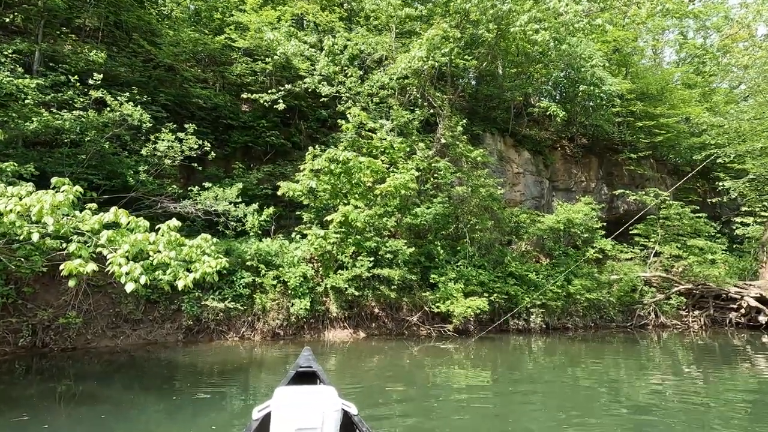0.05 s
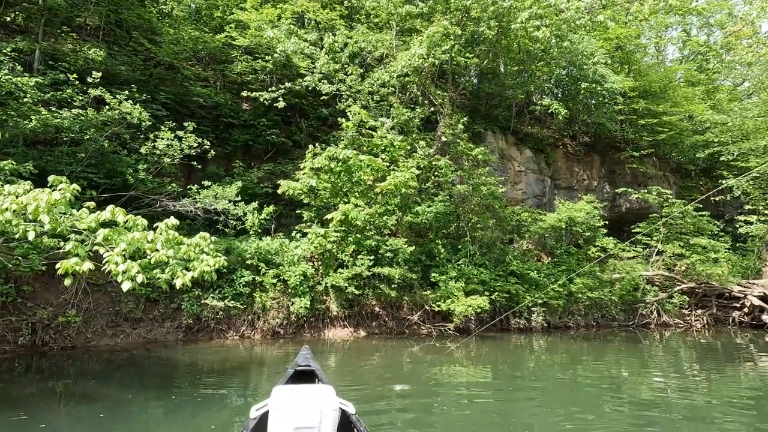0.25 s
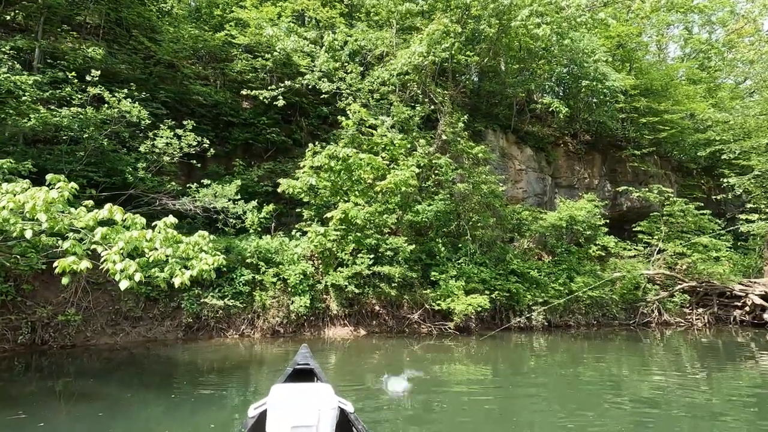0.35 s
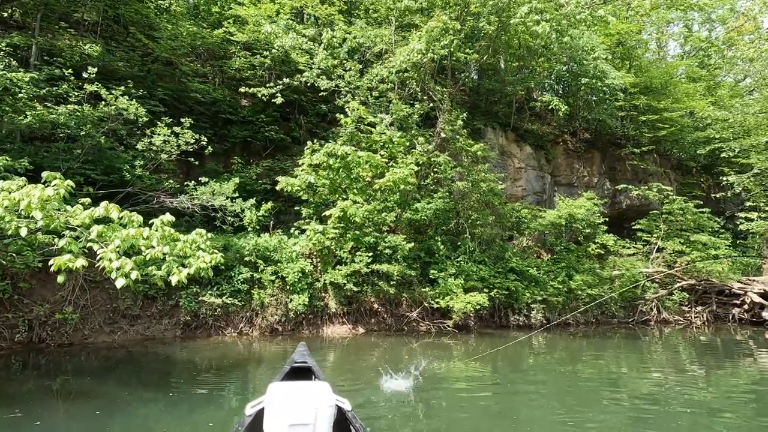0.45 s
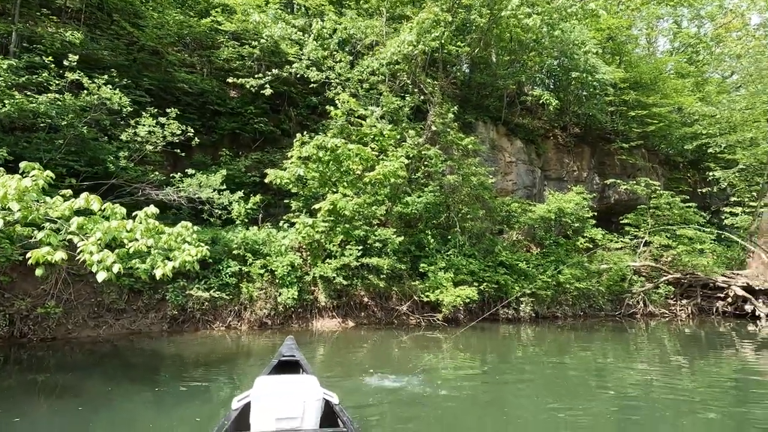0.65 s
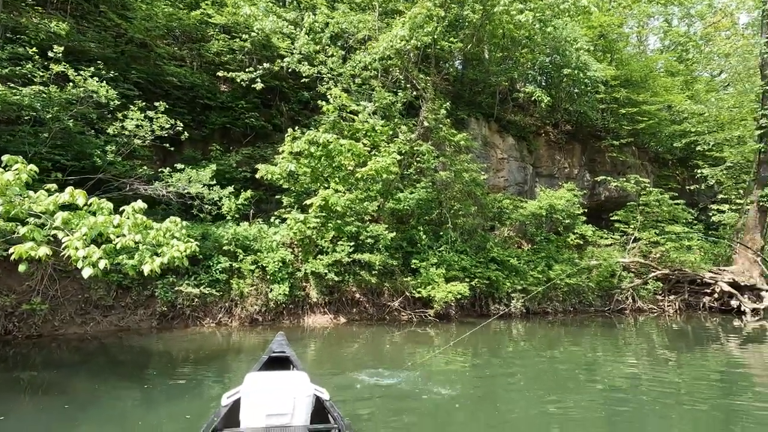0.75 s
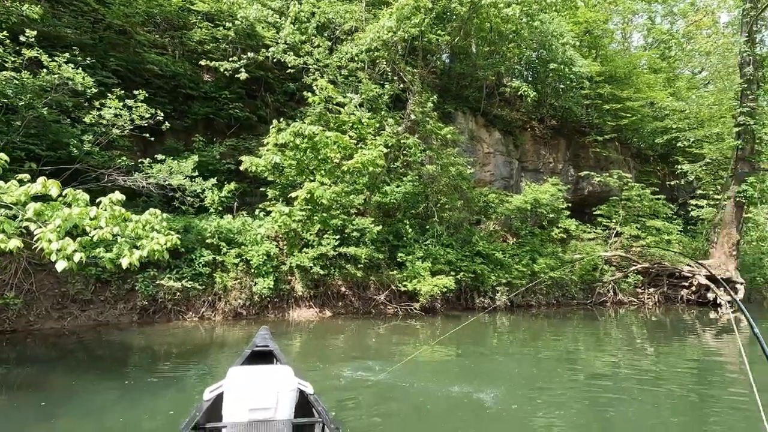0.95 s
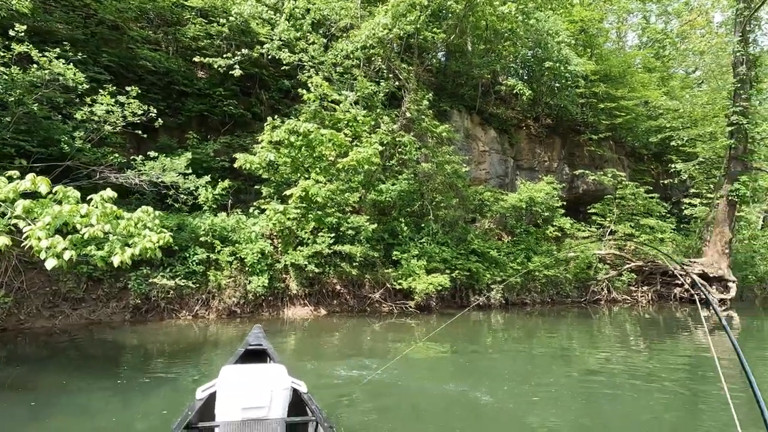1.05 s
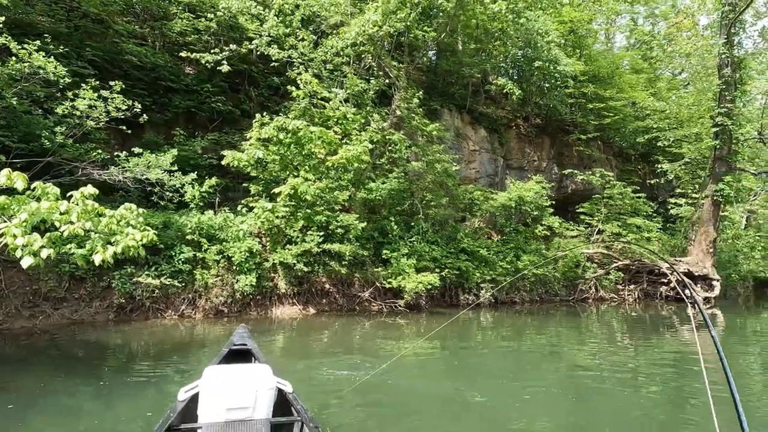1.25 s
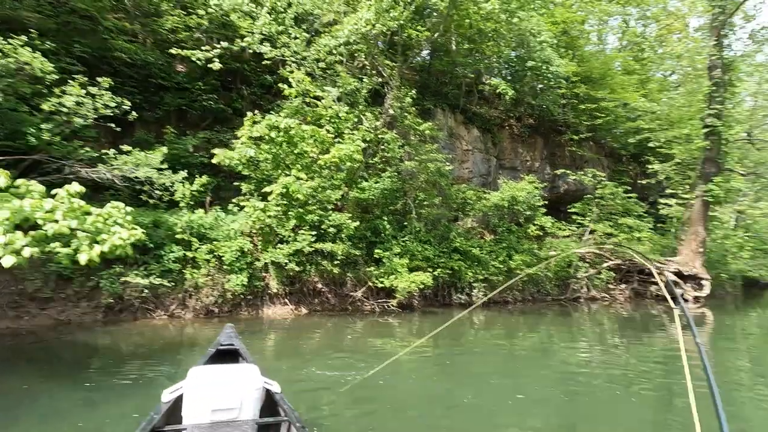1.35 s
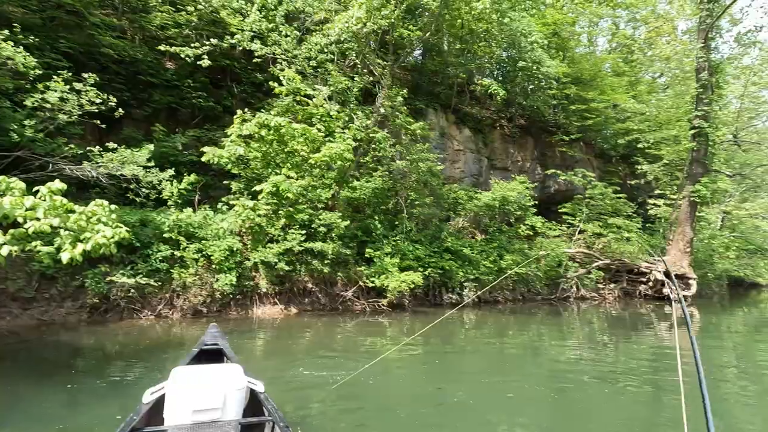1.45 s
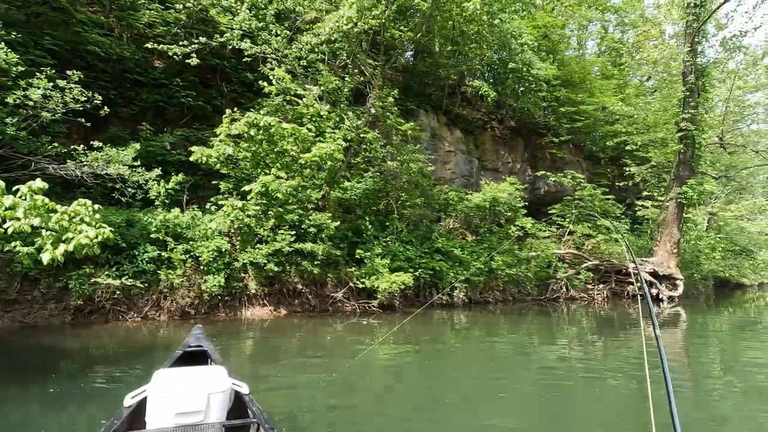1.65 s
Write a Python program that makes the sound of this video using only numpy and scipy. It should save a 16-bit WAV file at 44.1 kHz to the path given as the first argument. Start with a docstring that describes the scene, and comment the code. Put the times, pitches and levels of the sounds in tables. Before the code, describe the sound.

A fishing line hisses out and plops into a river with a knock, birds chirping faintly.

```python
"""On a quiet river, a fly is cast from a canoe. Sliding friction makes the line hiss in the rod guides.
The fly plops onto the water, where bubbles ring at their resonance, and the line snaps tight with a
knock. Spray patters back, slack is drawn in and the rod swishes once through the air. Birds chirp
along the wooded bank, which echoes them, over a light breeze and the low murmur of the river."""
import sys
import numpy as np
from scipy import signal
from scipy.fft import rfft, irfft
from scipy.io import wavfile
from scipy.ndimage import map_coordinates

SR = 44100
rng = np.random.default_rng(int(sys.argv[2]) if len(sys.argv) > 2 else 0)


def dump(signal):
    """Clip the signal to [-1, 1] and save it as 16-bit WAV at the path in sys.argv[1]."""
    limited = np.clip(np.atleast_2d(signal).T, -1, 1)
    pcm = np.round(limited * 32767).astype(np.int16)
    wavfile.write(sys.argv[1], SR, pcm)


N = 72765
T = np.arange(N) / SR

# Envelopes of the sustained sounds. Each row: time in seconds, level in dB.
LINE_OUT_LEVEL = [(0, -81.5), (.114, -89.5), (.121, -70), (.14, -73), (.155, -66.5), (.26, -57.5),
                  (.457, -54), (.472, -76.5), (.51, -114)]
LINE_IN_LEVEL = [(.5, -89), (.55, -77.5), (.74, -82.5), (.76, -64), (.805, -65.5), (.817, -79), (.83, -66),
                 (.86, -86), (1.2, -101)]
RUSTLE_LEVEL = [(1.31, -105), (1.34, -83.5), (1.6, -100)]
SPRAY_LEVEL = [(.4, -62), (.47, -68.5), (.53, -66), (.68, -62.5), (.79, -72.5), (.96, -95), (1.2, -105)]
TRICKLE_LEVEL = [(.68, -72), (1.0, -86.5), (1.2, -98.5)]
SWISH_LEVEL = [(1.22, -100), (1.28, -73), (1.38, -71), (1.45, -82), (1.6, -96)]
CHORUS_LEVEL = [(1.1, -82), (1.3, -86.5), (1.5, -79), (1.65, -84.5)]
BREEZE_LEVEL = [(0, -59), (.11, -43), (.56, -49), (1.1, -76.5)]
MURMUR_LEVEL = [(.4, -62.5), (.95, -60), (1.2, -63.5)]
RIPPLE_LEVEL = [(.08, -86), (.35, -70.5), (.75, -73), (1.04, -84), (1.65, -81.5)]

# Spectra of the noises. Each row: frequency in Hz, relative spectral density in dB.
HISS_SPECTRUM = [(600, -19), (1450, -15), (1800, -15.5), (3000, -6), (3800, 0.5), (4600, 0.5), (5900, -11),
                 (6900, -15), (8900, -35.5), (11000, -23.5), (13200, -38.5), (13900, -54)]
RUSTLE_SPECTRUM = [(2300, -20), (3800, 0), (7000, -37.5)]
SLAP_SPECTRUM = [(600, -23), (1100, 5), (2100, -4), (2900, -11.5), (5500, -15.5), (9000, -37),
                 (11500, -24.5), (15000, -68)]
SPRAY_SPECTRUM = [(200, -9.5), (450, -3), (700, -5), (1150, 1), (1650, -12.5), (7000, -22.5), (9000, -35),
                  (11500, -34.5), (15000, -53)]
SWISH_SPECTRUM = [(70, -1), (150, 10.5), (300, 1.5), (700, 8), (1300, 0.5), (7000, -42)]
CHORUS_SPECTRUM = [(1500, -13), (2550, 1.5), (2850, -1.5), (3150, 1), (5000, -57.5)]
BREEZE_SPECTRUM = [(12, 4), (28, -9.5), (1000, -72.5)]
MURMUR_SPECTRUM = [(25, 8), (60, -6.5), (100, -14), (160, 2.5), (240, -4.5), (330, -18.5), (550, -30.5),
                   (2500, -49), (16000, -59)]
RIPPLE_SPECTRUM = [(350, 6), (750, -4), (1150, 5), (1700, -3.5), (4000, -24), (7000, -24)]

# Motion of the line in the guides. Each row: time in seconds, relative speed.
LINE_SPEED = [(.24, .98), (.35, 1.04)]
# Jolts of the tightening line. Each row: start in seconds, relative impulse in dB, rise in seconds.
JOLTS = [(0.4538, -1, 0.0016), (0.4592, 0, 0.000021)]
# Response of each side to a jolt. Each row: frequency in Hz, gain in dB.
KNOCK_LEFT = [(5, 3.5), (30, 24.5), (220, 10.5), (480, -1.5), (1100, 9), (3000, -2), (8500, -24.5),
              (16500, -24.5)]
KNOCK_RIGHT = [(95, -5.5), (150, 20), (220, 20), (400, 18), (950, 11), (2000, -1.5), (3400, -11.5),
               (5200, -33.5), (10000, -51.5)]
# Fly and leader hitting the water. Each row: start in seconds, level in dB.
SLAPS = [(.4015, -40.5), (.4115, -41.5), (.4335, -42.5), (.4402, -39.5)]
# Bubbles of the plop and its drops. Each row: start in seconds, peak in dB, pitch in Hz, decay in seconds.
BUBBLES = [(0.401, -33, 1250, 0.0015), (0.4077, -36.5, 1066, 0.0022), (0.416, -37, 1106, 0.0017),
           (0.4332, -31.5, 1000, 0.00083), (0.4409, -36.5, 776, 0.00082), (.485, -52, 974, 0.0055),
           (.515, -49, 842, 0.0035), (.558, -53.5, 857, 0.0079), (.682, -54.5, 1163, 0.009),
           (.684, -55.5, 395, 0.005), (.695, -59, 527, 0.006), (.821, -62, 1150, .004),
           (0.8775, -62, 2700, 0.0013), (0.902, -66, 1260, 0.006), (0.938, -61, 1180, 0.0014),
           (1.004, -67, 3020, 0.0032)]
# Small wet ticks. Each row: start in seconds, level in dB, centre frequency in Hz.
TICKS = [(0.641, -58, 3070), (0.674, -70, 11100), (0.697, -57.5, 3650), (0.9, -61.5, 3420),
         (0.993, -70, 2910), (1.129, -72, 4600)]
# Bird notes. Each row: start and length in seconds, level in dB, first, middle and last pitch in Hz.
CHIRPS = [(-.02, 0.034, -64.5, 2200, 2004, 2160), (.008, 0.048, -79, 2300, 2950, 3350),
          (0.055, 0.064, -78.5, 3330, 2690, 2220), (1.08, 0.045, -67, 901, 1466, 2880),
          (1.102, 0.032, -68, 2250, 2565, 2500), (1.162, 0.049, -72, 1895, 2092, 1440),
          (1.238, 0.21, -82.5, 3055, 3140, 3086), (1.37, 0.02, -67.5, 2693, 2744, 2760),
          (1.451, 0.029, -73, 2483, 2413, 2350), (1.522, .042, -65.5, 2590, 2590, 2805),
          (1.569, 0.072, -75, 2290, 2017, 1460)]


def line_hiss(grain_db=1.75, grain_hz=280):
    """Sliding friction in the guides makes a grainy noise whose frequencies scale with line speed."""
    going_out = level(LINE_OUT_LEVEL) * pan(-3)
    coming_in = level(LINE_IN_LEVEL) * amp(1.76 * drift(hz=50))
    travel = np.cumsum(np.interp(T, *np.transpose(LINE_SPEED)))
    roughness = noise(HISS_SPECTRUM, phase_rad=-0.81)
    friction = np.array([map_coordinates(side, [travel], order=5, mode="mirror") for side in roughness])
    grain = amp(grain_db * drift(grain_hz))
    return np.hypot(going_out, coming_in) * grain * friction


def line_rustle():
    """Friction gives a brief rustle as the line slips along the rod."""
    return level(RUSTLE_LEVEL) * noise(RUSTLE_SPECTRUM)


def line_snap(shudder_s=0.455, shudder_width_s=0.0063, shudder_hz=143, shudder_db=-33):
    """Impulse excitation: the taut line knocks the microphone with a tug, a jolt and a low shudder."""
    force = np.zeros(N)
    for start, db, rise in JOLTS:
        age = np.maximum(np.arange(N) - round(start * SR), 0) / (SR * rise)
        pulse = age * np.exp(-age)
        force += amp(db) * pulse / pulse.sum()
    # The two sides swing in opposite directions.
    knock = np.array([-filtered(force, KNOCK_LEFT), filtered(force, KNOCK_RIGHT)])
    t = T - shudder_s
    shudder = -amp(shudder_db) * np.exp(-abs(t) / shudder_width_s) * np.cos(2 * np.pi * shudder_hz * t)
    return knock + pan(-11) * shudder


def splash(echo_db=-24, phase_rad=-0.45):
    """Impacts on water radiate noise bursts and bubble tones, which the bank reflects faintly."""
    landed = T >= SLAPS[0][0]
    sound = landed * (spray() + trickle() + trickle())  # two independent trickles
    sound += bursts(SLAPS, decay_s=0.0058) * noise(SLAP_SPECTRUM)[0]
    sound += sum(amp(db) * bubble(T - start, hz, decay) for start, db, hz, decay in BUBBLES)
    sound += wet_ticks()
    left = irfft(rfft(sound) * np.exp(1j * phase_rad), N)
    return np.array([left, sound]) + amp(echo_db) * bank_echo(sound)


def bubble(t, hz, decay_s, rise_per_decay=0.047, attack_share=0.49):
    """Trapped air rings as a damped oscillator of peak 1, its pitch climbing as it dies."""
    age = np.maximum(t, 0) / decay_s
    envelope = (1 - np.exp(-(age / attack_share) ** 2)) * np.exp(-age)
    cycles = hz * decay_s * age * (1 + rise_per_decay * age / 2)
    return envelope / envelope.max() * np.sin(2 * np.pi * cycles)


def spray(drops_per_s=1400):
    """Shot noise: drops of uneven size land at random instants and merge into a patter."""
    flicker = amp(2.9 * drift(hz=35))
    size = amp(-0.5 * np.minimum(rng.exponential(1, N), 4))
    drops = rng.standard_normal(N) * size * (rng.random(N) < drops_per_s / SR)
    return level(SPRAY_LEVEL) * flicker * unit(filtered(drops, SPRAY_SPECTRUM))


def trickle(bubbles_per_s=450, low_hz=900, high_hz=4200, decay_cycles=3.5, spread_db=2.5):
    """Tiny bubbles resonate with equal damping per cycle, so the high ones die sooner."""
    sound = np.zeros(N)
    chance, pitch, size = rng.random((3, N))
    for onset in np.flatnonzero(chance < bubbles_per_s / SR)[:-1]:
        hz = low_hz * (high_hz / low_hz) ** pitch[onset]
        gain = amp(spread_db * min(-np.log(1 - size[onset]), 3))
        ring = bubble(T[:SR // 20], hz, decay_cycles / hz)[:N - onset]
        sound[onset:onset + len(ring)] += gain * ring
    return level(TRICKLE_LEVEL) * unit(sound)


def wet_ticks(relative_width=0.13):
    """Short bursts of narrow-band noise are heard as ticks pitched at the centre of the band."""
    sound = np.zeros(N)
    for start, db, hz in TICKS:
        band = np.exp(-((np.fft.rfftfreq(N, 1 / SR) / hz - 1) / relative_width) ** 2 / 2)
        sound += bursts([(start, db)], decay_s=0.0023) * band_noise(band)
    return sound


def rod_swish():
    """Turbulence behind the moving rod radiates one soft swell of noise."""
    return level(SWISH_LEVEL) * noise(SWISH_SPECTRUM)


def birds(waver=0.028, echo_db=-8.5):
    """Frequency-modulated whistles echo off the bank; a far chorus blends into a band of noise."""
    notes = np.zeros(N)
    for start, length, db, *pitches in CHIRPS:
        progress = np.clip((T - start) / length, 0, 1)
        glide_hz = np.polyval(np.polyfit([0, .5, 1], pitches, 2), progress)
        hz = glide_hz * (1 + waver * drift(hz=212))
        notes += amp(db) * np.sin(np.pi * progress) * np.sin(2 * np.pi * np.cumsum(hz) / SR)
    echo = amp(echo_db) * bank_echo(notes)
    chorus = level(CHORUS_LEVEL) * amp(2 * drift(hz=24.8)) * noise(CHORUS_SPECTRUM)
    return notes + echo + chorus


def breeze():
    """Turbulent pressure on the microphone makes a rumble, incoherent between the sides."""
    return level(BREEZE_LEVEL) * pan(-0.5) * noise(BREEZE_SPECTRUM, coherence=0)


def river():
    """Two broadband noises superpose: the low murmur of the river and ripples along the bank."""
    murmur = level(MURMUR_LEVEL) * noise(MURMUR_SPECTRUM)
    ripples = level(RIPPLE_LEVEL) * amp(0.63 * drift(hz=61.3)) * noise(RIPPLE_SPECTRUM)
    return murmur + ripples


def bank_echo(sound, t60_s=0.44, build_s=0.02):
    """Scattering from the wooded bank gives a diffuse tail that decays exponentially."""
    envelope = amp(-60 * T / t60_s) * np.minimum(T / build_s, 1)
    tail = unit(rng.standard_normal(N) * envelope) / np.sqrt(N)
    return signal.fftconvolve(sound, tail)[:N]


def amp(db):
    """Amplitude ratio for a level in decibels."""
    return 10 ** (np.asarray(db) / 20)


def unit(x):
    """Normalisation to rms 1."""
    return x / np.sqrt(np.mean(x ** 2) + 1e-30)


def level(envelope):
    """Gain over time, interpolated in decibels."""
    return amp(np.interp(T, *np.transpose(envelope)))


def pan(db):
    """Gains for a level difference of left over right."""
    return amp(np.array([[db], [-db]]) / 2)


def bin_gains(spectrum, size):
    """Gain per bin, interpolated in decibels over log frequency."""
    hz, db = np.transpose(spectrum)
    return amp(np.interp(np.log(np.fft.rfftfreq(size, 1 / SR) + 1), np.log(hz + 1), db))


def filtered(x, spectrum, size=8192):
    """Minimum-phase filtering: the phase follows from the Hilbert transform of the log gain."""
    log_gain = np.log(bin_gains(spectrum, size))
    mirrored = np.concatenate([log_gain, log_gain[-2:0:-1]])
    response = np.fft.ifft(np.exp(np.conj(signal.hilbert(mirrored)))).real[:size // 2]
    return signal.fftconvolve(x, response)[:N]


def band_noise(gains):
    """White noise weighted bin by bin, at rms 1."""
    return unit(irfft(rfft(rng.standard_normal(N)) * gains, N))


def drift(hz):
    """Low-pass noise: a random wander of rms 1."""
    return band_noise(np.exp(-(np.fft.rfftfreq(N, 1 / SR) / hz) ** 2))


def noise(spectrum, coherence=1, phase_rad=0):
    """Coloured stereo noise of rms 1 with a set coherence and phase between the sides."""
    common, separate = rfft(rng.standard_normal((2, N))) * bin_gains(spectrum, N)
    left = common * np.exp(1j * phase_rad)
    right = coherence * common + np.sqrt(1 - coherence ** 2) * separate
    return unit(irfft(np.array([left, right]), N))


def bursts(rows, decay_s, attack_s=0.00046):
    """Envelope of transients that rise quickly and decay exponentially."""
    envelope = np.zeros(N)
    for start, db in rows:
        age = np.maximum(T - start, 0)
        envelope += amp(db) * (1 - np.exp(-(age / attack_s) ** 2)) * np.exp(-age / decay_s)
    return envelope


def scene():
    """Superposition: the pressures of all sources add."""
    return line_hiss() + line_rustle() + line_snap() + splash() + birds() + river() + breeze() + rod_swish()


def record(dry, cutoff_hz=16480):
    """A linear-phase low-pass filter limits the bandwidth."""
    lowpass = signal.firwin(511, cutoff_hz, window=("kaiser", 9), fs=SR)
    return signal.oaconvolve(dry, lowpass[None], "same")


dry = scene()
out = record(dry)
dump(out)
```